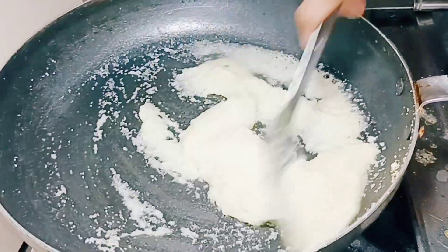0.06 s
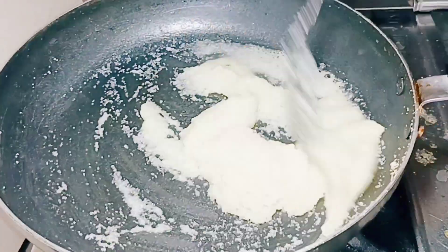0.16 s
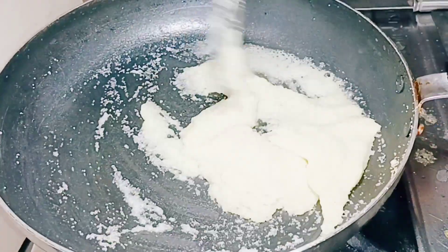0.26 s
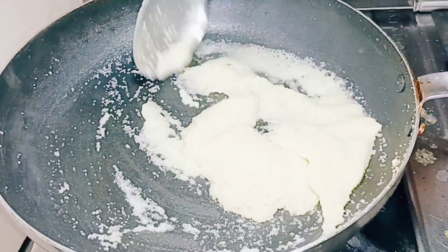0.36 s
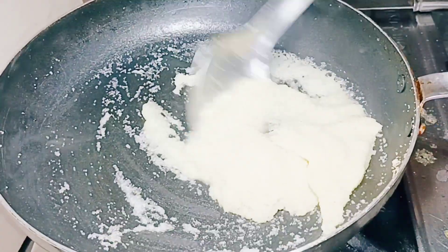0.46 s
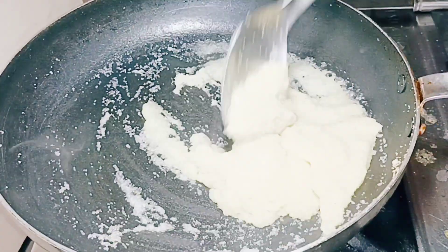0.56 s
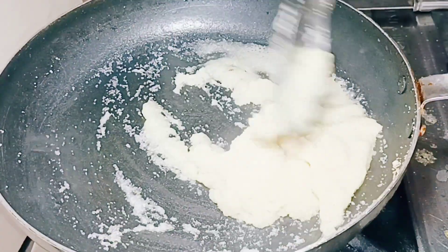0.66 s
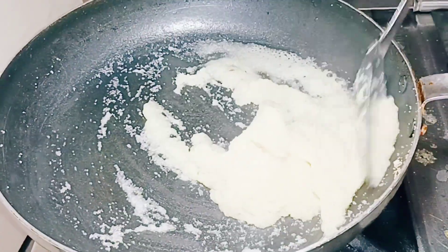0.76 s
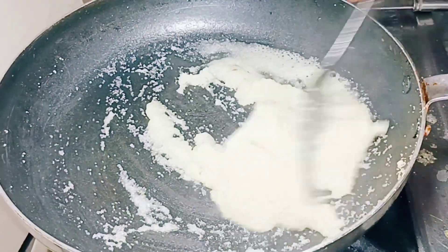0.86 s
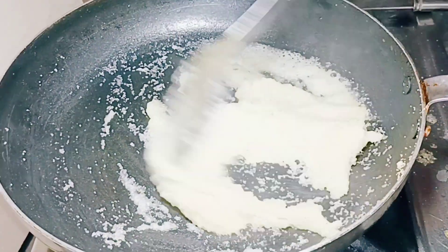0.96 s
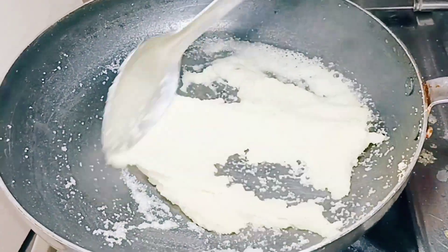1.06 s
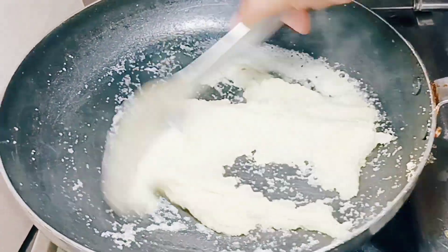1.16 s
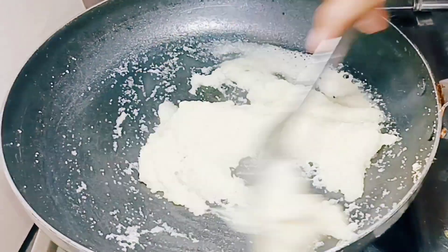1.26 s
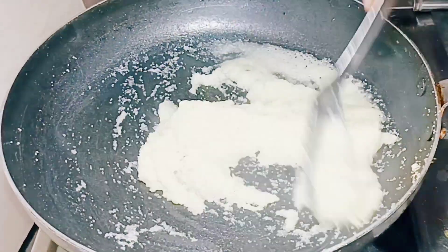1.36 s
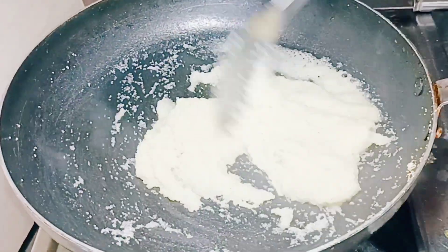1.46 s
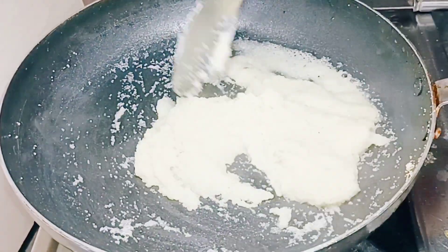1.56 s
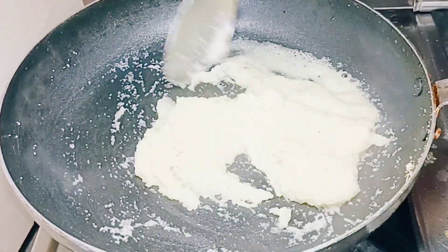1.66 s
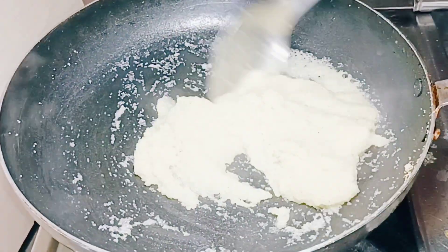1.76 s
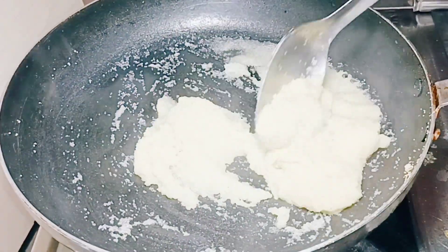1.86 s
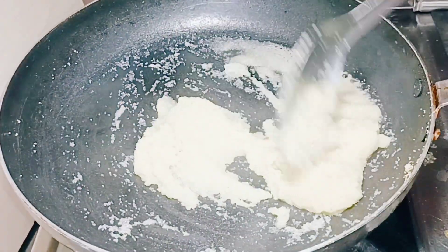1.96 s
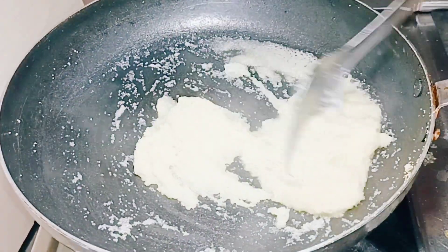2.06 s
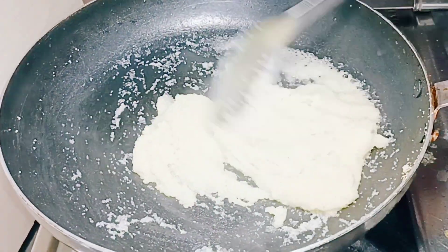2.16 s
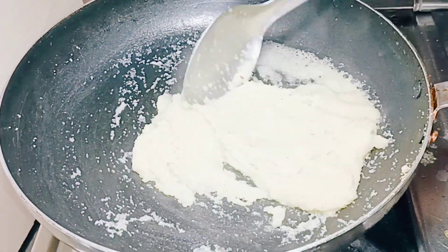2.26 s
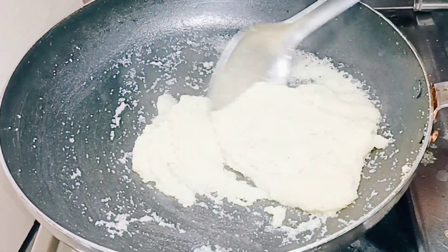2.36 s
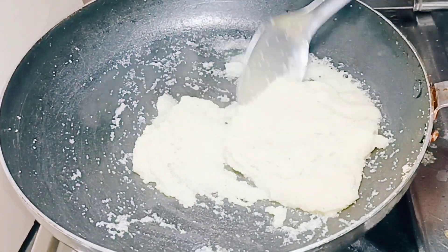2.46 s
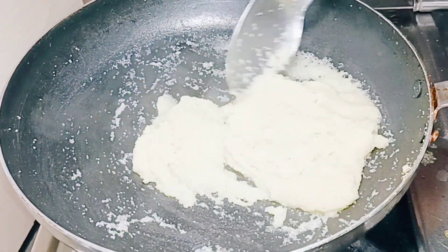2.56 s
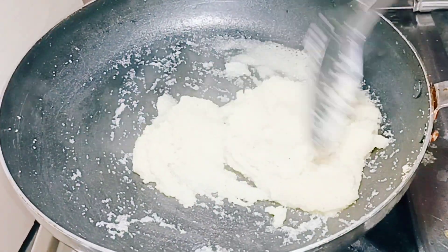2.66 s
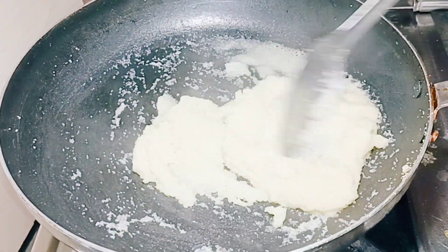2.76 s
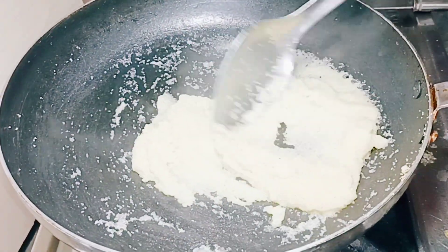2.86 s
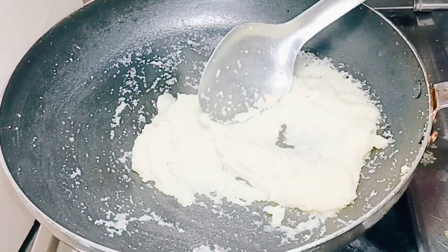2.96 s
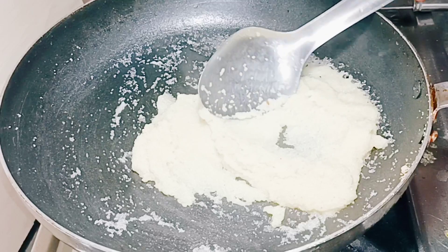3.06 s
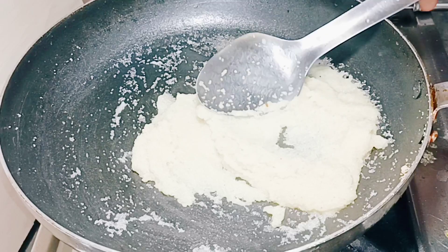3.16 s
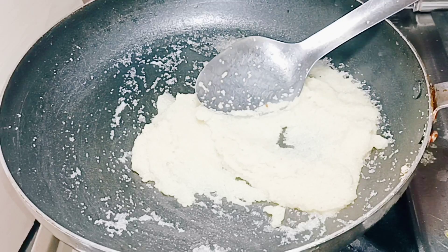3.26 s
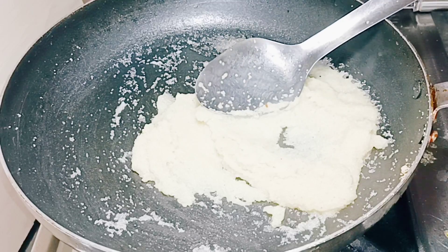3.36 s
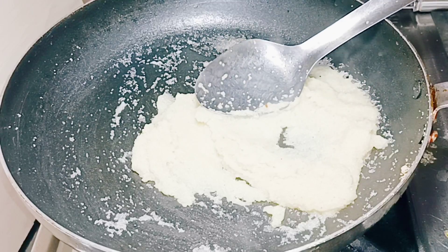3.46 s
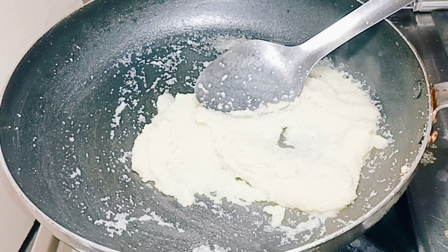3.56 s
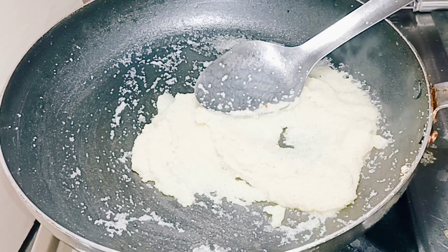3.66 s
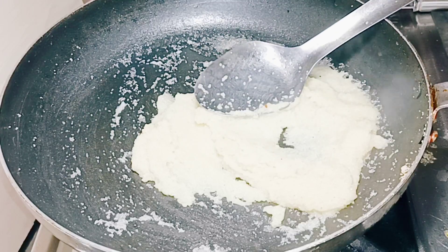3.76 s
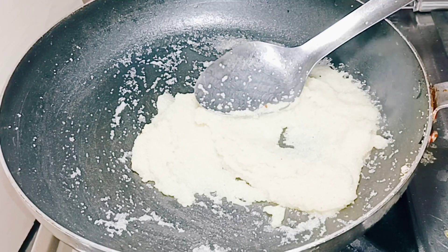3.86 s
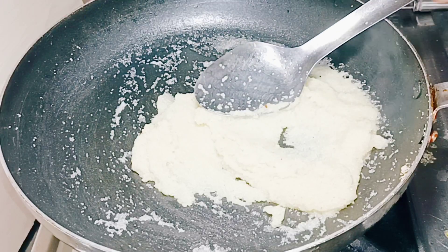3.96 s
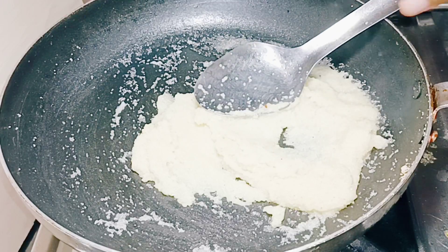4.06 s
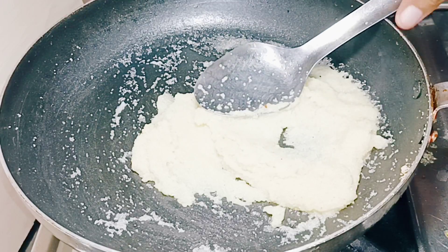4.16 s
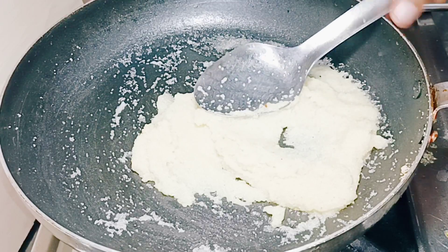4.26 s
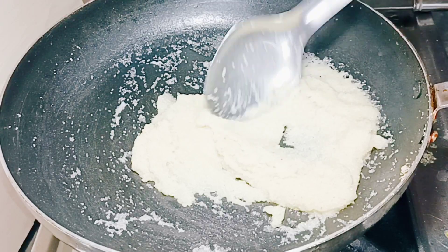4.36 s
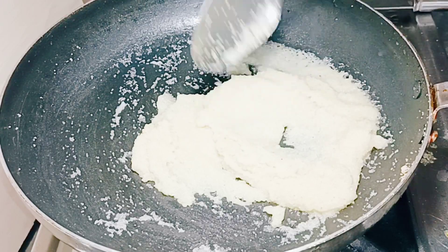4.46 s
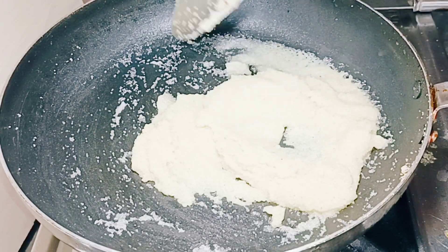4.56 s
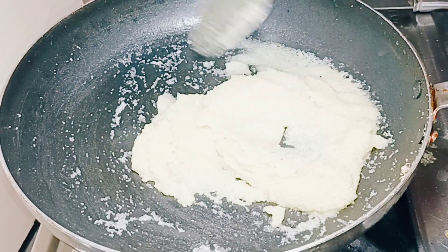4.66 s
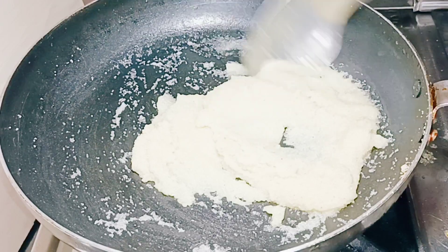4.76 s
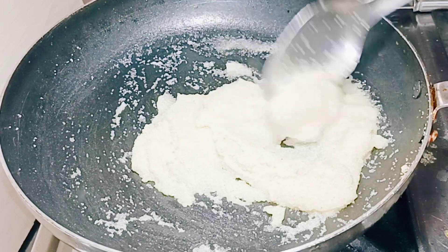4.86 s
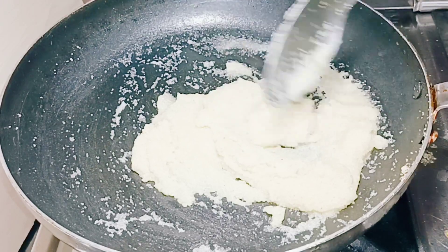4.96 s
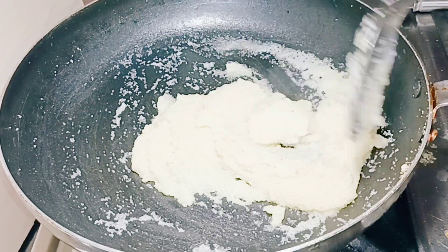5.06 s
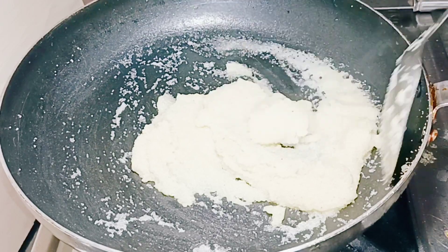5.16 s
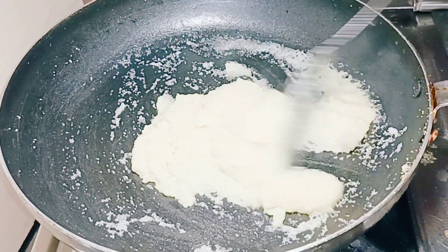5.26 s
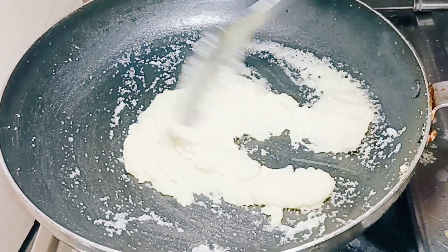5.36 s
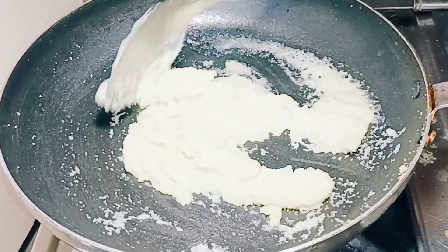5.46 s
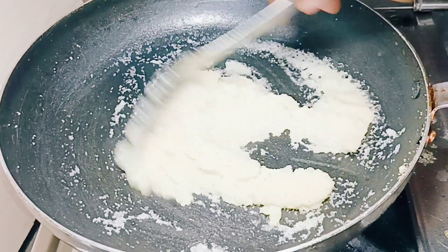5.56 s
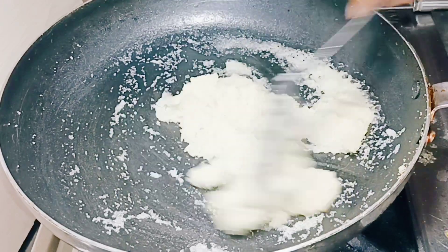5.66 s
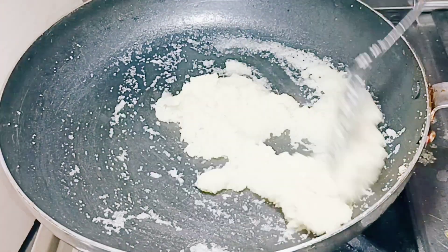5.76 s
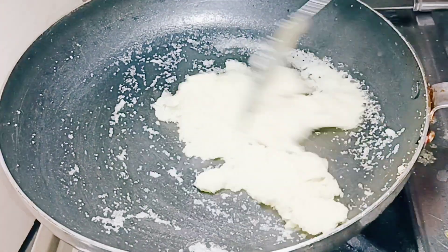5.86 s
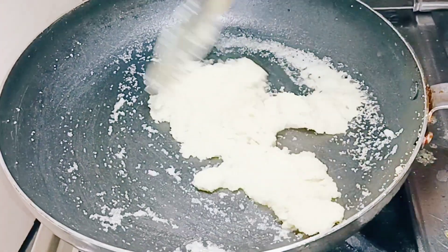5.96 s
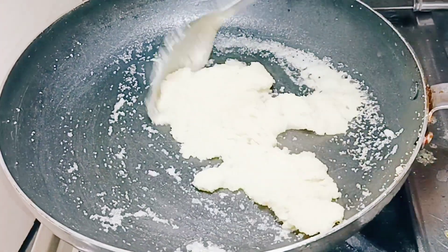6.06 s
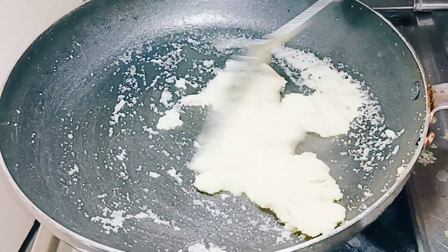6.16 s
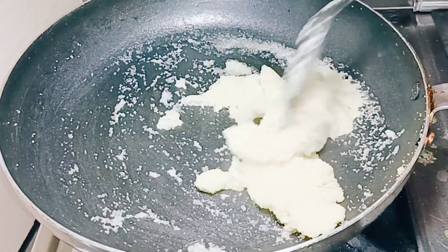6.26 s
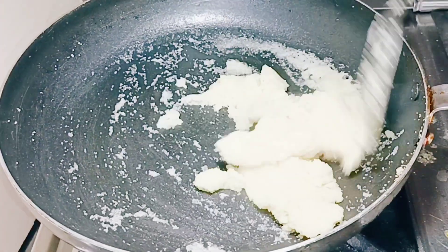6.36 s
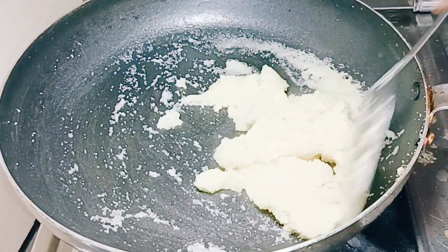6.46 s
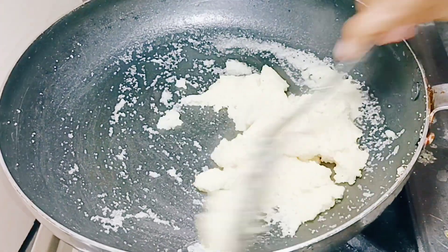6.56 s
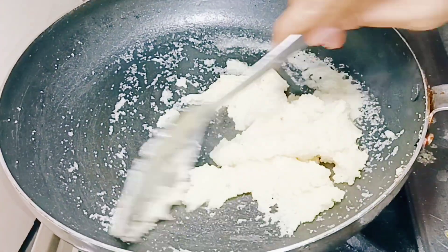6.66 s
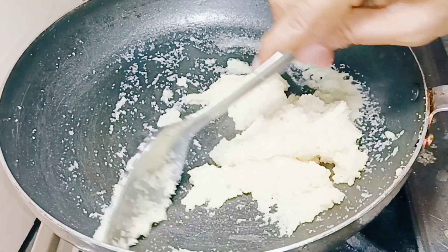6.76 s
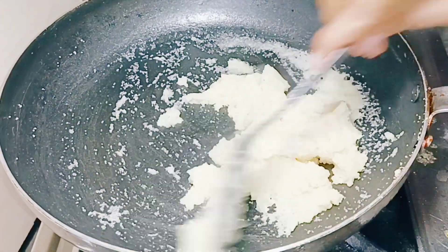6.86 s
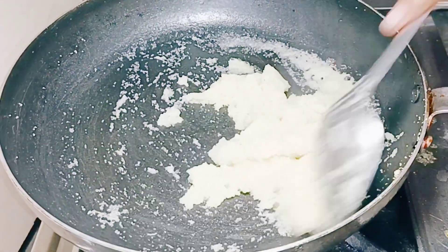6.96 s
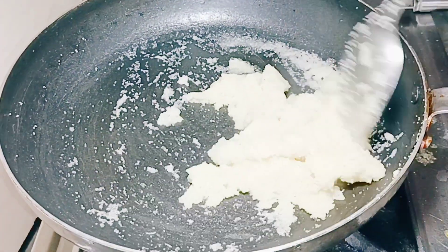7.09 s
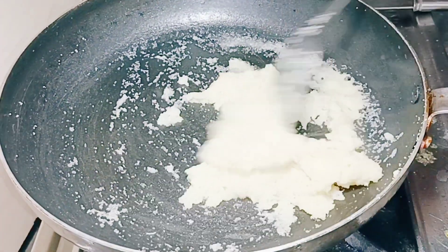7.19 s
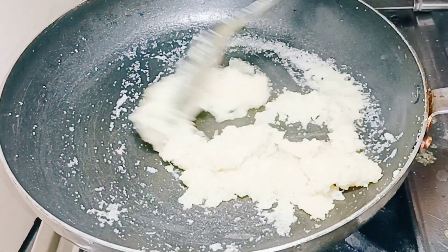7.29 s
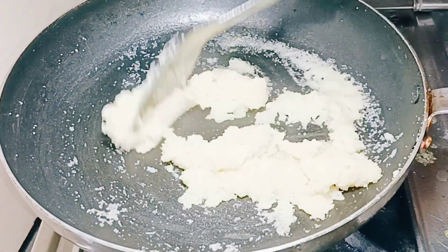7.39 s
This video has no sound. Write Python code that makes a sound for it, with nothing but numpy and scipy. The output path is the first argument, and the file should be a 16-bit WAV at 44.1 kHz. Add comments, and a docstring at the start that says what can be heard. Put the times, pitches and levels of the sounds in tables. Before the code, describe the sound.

A steel spoon stirs thick paste in a coated frying pan on a lit stove. Short hard clacks lead into gritty scrapes with rough squeaks and soft wet thuds. The strokes stop for about two seconds, leaving quiet sizzle, low stove noise and faint steam whistles, then return loud and frequent to the end. Close microphone in a small hard-walled kitchen, short tail.

```python
"""A steel spoon stirs thick paste in a coated frying pan on a lit stove, in a small kitchen.
First come quick strokes: noisy drags over the gritty coating, squeaks, and short clacks as the spoon lands.
In the middle the spoon mostly rests, with faint whistles, probably of steam escaping the paste; then loud
strokes return to the end. Shaped noise makes stove, sizzle and paste throughout; blows and tiny slips ring
the pan's resonances, rough gliding tones squeak and whistle, and the kitchen walls add a short tail."""
import sys
import numpy as np
from scipy import signal
from scipy.fft import rfft, irfft
from scipy.io import wavfile
from scipy.ndimage import uniform_filter1d

SR = 44100
rng = np.random.default_rng(int(sys.argv[2]) if len(sys.argv) > 2 else 0)


def unload_audio(sound):
    """Save the sound as a 16-bit wav file, at the path given as the first command line argument."""
    columns = np.transpose(np.atleast_2d(sound))
    # keep every value between -1 and 1, then stretch to whole-number steps
    steps = np.round(np.clip(columns, -1, 1) * 32767)
    wavfile.write(sys.argv[1], SR, steps.astype(np.int16))


N = 327663
TIME = np.arange(N) / SR


def from_db(db):
    """Turn decibels into a gain."""
    return 10 ** (np.asarray(db) / 20)


def rms_one(x):
    """Scale a sound to an average strength (rms) of 1."""
    return x / np.sqrt(np.mean(x ** 2) + 1e-20)


def evened(x, size=700):
    """Hold the short-term rms at 1, averaged over size samples, so that a separate level can shape it."""
    power = np.maximum(uniform_filter1d(x * x, size), 0)
    return x / np.sqrt(power + 1e-20)


def in_time(rows):
    """Draw straight lines between the rows to get each column at every sample."""
    s, *columns = np.transpose(rows)
    return [np.interp(TIME, s, c) for c in columns]


def gate(t, start, end, rise_s, fall_s):
    """One from start to end, with exponential edges."""
    return np.exp(np.minimum(t - start, 0) / rise_s - np.maximum(t - end, 0) / fall_s)


def drift(rate, size=N):
    """Wander randomly around 0, with rate new random values a second joined by straight lines."""
    steps = np.arange(size) * rate / SR
    count = int(steps[-1]) + 2
    return 1.2 * np.interp(steps, np.arange(count), rng.standard_normal(count))


def coloured(x, colour):
    """Filter to the given spectrum without sounding ahead of time (minimum phase)."""
    size = 2048
    hz, db = np.transpose(colour)
    log_grid = np.log(np.fft.rfftfreq(size, 1 / SR) + 1)
    log_gain = np.log(from_db(np.interp(log_grid, np.log(hz), db)))
    # folding the cepstrum moves the filter's energy to its start
    cepstrum = irfft(log_gain)[:size // 2]
    cepstrum[1:] *= 2
    response = irfft(np.exp(rfft(cepstrum, size)))
    return signal.oaconvolve(x, response)[:len(x)]


def three_bands(x, low_hz=1100, high_hz=3400):
    """Split a sound into its low, middle and high parts."""
    splits = ((low_hz, "low"), ([low_hz, high_hz], "band"), (high_hz, "high"))
    return [signal.sosfilt(signal.butter(4, edge, kind, fs=SR, output="sos"), x)
            for edge, kind in splits]


def resonance(x, hz, width_hz):
    """Ring at one pitch (two-pole filter, gain 1 at its peak); a narrower width rings longer."""
    r = np.exp(-np.pi * width_hz / SR)
    feedback = [1, -2 * r * np.cos(2 * np.pi * hz / SR), r * r]
    return signal.lfilter(np.array([1, 0, -1]) * (1 - r * r) / 2, feedback, x + 1e-18)


# Spectrum of the stove noise. Each row: frequency in Hz, gain in dB.
STOVE_SPECTRUM = [(20, -16), (45, -6), (100, 7.5), (170, -6.5), (270, -4), (420, -4), (800, -5),
                  (1400, -7.5), (3000, -22.5), (8000, -47)]


def stove(level_db=-71.5):
    """The lit stove is a steady, mostly low noise."""
    return from_db(level_db) * rms_one(coloured(rng.standard_normal(N), STOVE_SPECTRUM))


# Strength of the sizzle over time. Each row: time in seconds, level in dB before flicker.
SIZZLE_LEVEL = [(0, -65), (.8, -69.5), (2.1, -71.5), (2.85, -69), (3.1, -74), (3.5, -69.5), (4.3, -72),
                (4.7, -66.5), (5.2, -71), (7.43, -69.5)]
# Spectrum of the sizzle. Each row: frequency in Hz, gain in dB.
SIZZLE_SPECTRUM = [(800, -18), (1600, 4.5), (2500, 1.5), (3500, -3), (6300, -8), (7300, -16), (8200, -28),
                   (16000, -32)]


def frying(pop_spread_db=3, flicker_db=0.65):
    """Countless tiny bubbles burst at the rim of the paste: noise with an uneven strength."""
    sizzle_db, = in_time(SIZZLE_LEVEL)
    pop_db = pop_spread_db * np.minimum(rng.exponential(1, N), 5)
    pops = rng.standard_normal(N) * from_db(pop_db)
    return rms_one(coloured(pops, SIZZLE_SPECTRUM)) * from_db(sizzle_db + flicker_db * drift(25))


def shove(middle_s, length_s, edge_db=7):
    """A soft swell and fade, edge_db weaker at the ends of the shove than in its middle."""
    from_middle = 2 * (TIME - middle_s) / length_s
    return from_db(-edge_db * np.minimum(from_middle ** 2, 20))


# Spectrum of the rustle. Each row: frequency in Hz, gain in dB.
RUSTLE_SPECTRUM = [(90, -12.5), (220, 0), (450, -0.5), (800, -13.5), (1500, -11), (3000, -22.5),
                   (8000, -46)]


def rustle(rest_db=-83, lumpy_db=1.0):
    """Wet paste parts unevenly around the bowl of the spoon: noise that swells with each shove."""
    moved = from_db(rest_db) + sum(from_db(db) * shove(s, length_s) for s, length_s, _, db in PASTE_SHOVES)
    noise = rms_one(coloured(rng.standard_normal(N), RUSTLE_SPECTRUM))
    return noise * moved * from_db(lumpy_db * drift(35))


def lumps(band_hz):
    """Dull, low noise of moving paste, rms 1."""
    band = signal.butter(2, band_hz, "band", fs=SR, output="sos")
    return rms_one(signal.sosfilt(band, rng.standard_normal(N)))


# The spoon shifts paste without scraping; the rustle uses these rows too.
# Each row: middle in seconds, length in seconds, thud level in dB, rustle level in dB before unevenness.
PASTE_SHOVES = [(1.128, 0.2, -53, -58.5), (1.641, 0.085, -64, -84), (2.682, 0.12, -66.5, -89),
                (3.152, 0.15, -68, -68), (4.045, 0.16, -73, -79.5), (4.72, 0.35, -78, -66),
                (5.15, 0.36, -82, -68.5)]


def paste(thud_trim_db=-1, thud_delay_s=0.028):
    """Soft lumps thud just after each drag starts, and flop over more deeply when shoved."""
    thuds = sum(from_db(db + thud_trim_db) * gate(TIME - s, thud_delay_s, thud_delay_s, 0.032, 0.055)
                for s, *_, db in SPOON_DRAGS)
    flops = sum(from_db(db) * shove(s, length_s) for s, length_s, db, _ in PASTE_SHOVES)
    return thuds * lumps((115, 240)) + flops * lumps((33, 200))


def kitchen(x, wet_db=-10.0, t60_s=0.18, wall_cut_hz=9000):
    """Close hard walls add a diffuse tail that builds up and dies quickly; they swallow the top treble."""
    first_wall_s, build_s = 0.007, 0.014
    t = np.arange(SR // 2) / SR
    build_up = 1 - np.exp(-np.maximum(t - first_wall_s, 0) / build_s)
    tail = rng.standard_normal(len(t)) * from_db(-60 * t / t60_s) * build_up
    tail = tail / np.linalg.norm(tail)
    tail = signal.sosfilt(signal.butter(2, wall_cut_hz, fs=SR, output="sos"), tail)
    return x + from_db(wet_db) * signal.oaconvolve(x, tail)[:N]


# Resonances of pan and spoon.
# Each row: pitch in Hz, relative strength in dB, time to fade by 60 dB in seconds.
PAN_MODES = [(318, 12, 0.33), (600.7, -4, 0.069), (948, -12, 0.3), (1180, -8.5, 0.1), (1384, -7, 0.14),
             (1490, -0.5, 0.22), (1675, -3, 0.2), (2066, -6, 0.05), (2314, -4, 0.018), (2840, -10.5, 0.6),
             (2560, -10.5, 0.28), (2800, -6, 0.31), (3760, -1, 0.057), (4670, -1.5, 0.02),
             (5360, -5.5, 0.08), (5350, -5.5, .18), (5830, -0.5, .1), (6120, 1, 0.17), (5860, -11.5, 0.36),
             (7300, -2.5, 0.035)]


def pan(force, ring_db, place_spread_db=-0.9):
    """The damped pan answers broadly; how far each mode stands out depends on where it is touched."""
    place_db = place_spread_db * rng.standard_normal(len(PAN_MODES))
    ringing = sum(from_db(db + ring_db + extra) * resonance(force, hz, np.log(1000) / (np.pi * t60))
                  for (hz, db, t60), extra in zip(PAN_MODES, place_db))
    return force + ringing


# The spoon meets the pan. Each row: time in seconds, then the strength of the low, middle and high bands
# in dB (rms over the first 10 ms), then the resonance of the contact in Hz.
SPOON_KNOCKS = [(0.541, -23, -21, -28.5, 2170), (0.767, -79, -66, -63, 4483),
                (0.902, -31, -23, -24.5, 2750), (1.2524, -22, -33, -39.5, 584),
                (1.423, -54, -49, -50.5, 1200), (1.507, -49, -47, -65, 2000),
                (1.817, -23, -24, -27.5, 3110), (2.4654, -30, -34, -56.5, 599),
                (3.2436, -65, -45.5, -47.5, 2380), (4.8204, -24.5, -22.5, -27.5, 2320),
                (4.8302, -30, -29.5, -37.5, 1340), (5.097, -60.5, -68, -92, 1500),
                (5.183, -59.5, -63.5, -88, 1790), (5.2715, -39.5, -29.5, -38.5, 2960),
                (5.278, -43, -20, -23, 3000), (5.6372, -20.5, -17, -27, 2380),
                (5.8868, -29.5, -19, -32, 2630), (6.2027, -25, -19, -30, 1956),
                (6.4368, -82, -61, -62.5, 5500), (6.5532, -29.5, -22.5, -24, 2770),
                (6.8912, -23, -22, -31.5, 1770), (7.2741, -22.5, -14.5, -24, 2220)]
# Spectrum of the clacks. Each row: frequency in Hz, gain in dB.
CLACK_SPECTRUM = [(59, -66.5), (100, -32.5), (389, -14), (595, -3.5), (1150, -5.5), (1280, -7), (1650, 0.5),
                  (2080, -2.5), (2320, -2.5), (3050, -2.5), (3400, -7), (5770, -6), (7450, -16.5),
                  (8280, -28.5), (13000, -37), (16000, -34)]


def clacks(chatter_db=-17, chatter_t60_s=0.044, contact_db=5, contact_width_hz=260):
    """The edge lands in one sharp blow and a dying chatter; the paste damps the ring quickly."""
    out = np.zeros(N + SR)
    t = np.arange(SR // 5) / SR
    attack = SR // 100
    for s, *band_db, hz in SPOON_KNOCKS:
        force = from_db(chatter_db - 60 * t / chatter_t60_s) * rng.standard_normal(len(t))
        force[0] += 1  # the blow itself
        force = force + from_db(contact_db) * resonance(force, hz, contact_width_hz)
        bands = three_bands(coloured(pan(force, ring_db=3.5), CLACK_SPECTRUM))
        at = round(s * SR)
        out[at:at + len(t)] += sum(from_db(db) * band / np.std(band[:attack])
                                   for db, band in zip(band_db, bands))
    return out[:N]


# Squeaks of the spoon's edge, and faint whistles, probably of steam escaping the paste.
# Each row: start in seconds, length in seconds, first pitch in Hz, last pitch in Hz,
# level in dB before trim, roughness in random changes per second.
SQUEAKS_AND_WHISTLES = [(0, 0.019, 1855, 1895, -20, 170), (.1, 0.13, 3280, 2586, -29, 338),
                        (.08, 0.22, 1950, 1067, -28, 401.5), (.09, .16, 5850, 5740, -42, 390),
                        (.24, 0.068, 474, 403, -47, 90), (.545, 0.052, 1143, 1100, -21.5, 131),
                        (.585, 0.032, 2900, 2910, -29.5, 253), (1.422, 0.092, 328, 328, -44.5, 39.7),
                        (1.617, 0.11, 606, 602, -63.5, 50.5), (2.46, 0.047, 568, 528, -38.5, 112),
                        (2.681, 0.093, 591, 590, -65, 60), (2.889, 0.068, 4650, 4650, -67, 150),
                        (3.233, 0.097, 782, 766, -48.5, 70), (3.52, .33, 2590, 2665, -62, 130),
                        (3.755, .11, 3330, 3450, -62.5, 120), (3.754, 0.078, 5600, 5670, -56, 460),
                        (4.42, 0.095, 5900, 6210, -66, 179), (4.585, 0.47, 4770, 4800, -70.5, 157),
                        (4.825, 0.044, 1382, 1410, -26, 150), (4.86, 0.083, 2050, 2007, -33.5, 198),
                        (5.09, 0.055, 732, 770, -58.5, 70), (5.17, .06, 1820, 1840, -55, 110),
                        (5.333, 0.09, 4520, 4700, -32.5, 329), (5.345, 0.082, 2560, 2548, -29.5, 300),
                        (6.02, 0.18, 5230, 5300, -64.5, 111), (6.216, 0.076, 682, 706, -31.5, 121.5),
                        (6.6, 0.082, 1740, 1797, -31.5, 226), (6.62, 0.097, 672, 565, -24.5, 101.4),
                        (6.743, 0.13, 1527, 1450, -61, 70), (6.931, 0.17, 930, 944, -24.5, 204.6),
                        (6.95, 0.21, 2183, 1830, -25.5, 385.6), (6.96, 0.23, 5940, 5610, -36.5, 600)]


def squeaks_and_whistles(trim_db=-1):
    """Each one swells and fades as a rough, narrow band gliding from its first pitch to its last."""
    out = np.zeros(N + SR)
    for s, length_s, hz, end_hz, db, roughness in SQUEAKS_AND_WHISTLES:
        at, size = round(s * SR), round(length_s * SR)
        phase = 2 * np.pi * np.cumsum(np.linspace(hz, end_hz, size)) / SR
        tone = drift(roughness, size) * np.cos(phase) + drift(roughness, size) * np.sin(phase)
        out[at:at + size] += from_db(db + trim_db) * evened(tone, size=1300) * np.hanning(size)
    return out[:N]


def sliding_contact(force, count=22, ring_db=5):
    """As the contact point travels, resonances between spoon and pan come and go."""
    centres = np.geomspace(600, 7200, count) * np.exp(rng.normal(0, 0.04, count))
    rings = sum(drift(28, len(force)) * resonance(force, hz, 40 + hz / 60) for hz in centres)
    return force + from_db(ring_db) * rings


def push_db(t, peak_s, length_s, swell_db, ease_db=7):
    """The hand moves smoothly to the peak of its push, then slackens by ease_db before the spoon lifts."""
    lean = np.clip(t / peak_s, 0, 1)
    slacken = np.clip((t - peak_s) / max(length_s - peak_s, 1e-3), 0, 1)
    return -swell_db * np.cos(np.pi / 2 * lean) ** 2 - ease_db * slacken


# The spoon is pushed across the pan, then eases off and lifts; the paste thuds use these rows too.
# Each row: start in seconds, time to the peak of the push in seconds, length in seconds, swell up to the
# peak in dB (negative sinks), middle band in dB before pan and trim, low and high bands in dB relative to
# the middle, top treble level change in dB before unevenness, paste thud in dB before its trim.
SPOON_DRAGS = [(0.0, 0.016, 0.035, -0.5, -24, -17, 1, 12.5, -63.5),
               (0.049, 0.11, .21, 5, -29, -10.5, -1.5, 5.5, -66),
               (0.551, 0.047, 0.073, 5.5, -24, -6.5, -5.5, 5, -52.5),
               (0.907, 0.04, 0.12, 7, -34.5, -0.5, 1, 6.5, -50),
               (1.264, 0.058, 0.075, 15, -29, -5.5, -4, 9, -59.5),
               (1.416, 0.025, 0.072, 4.5, -44, 4, -4, 8, -75.5),
               (1.827, 0.078, 0.099, 6.5, -29.5, -3.5, -5.5, 2, -57.5),
               (2.474, .03, 0.085, -5.5, -38.5, -4.5, -20, -8, -65),
               (3.246, .025, 0.048, 8, -52.5, 6, 1, -4, -59.5),
               (4.831, 0.084, 0.097, 8, -25, -7.5, 0, -4.5, -50.5),
               (5.286, .1, 0.12, 20.5, -28.5, -6, -2.5, 3, -49),
               (5.648, 0.048, 0.096, 2.5, -26, -9, -5, 0, -51.5),
               (5.896, 0.056, 0.079, 6, -25, -10.5, -12.5, 10, -49),
               (6.213, 0.048, 0.069, 7.5, -27.5, -3.5, -8, -2, -56),
               (6.563, 0.15, .16, 2, -34.5, -3, -2.5, 5, -47.5),
               (6.901, 0.076, 0.23, 6, -24.5, -3, -8.5, 3.5, -57),
               (7.285, 0.062, .069, 11, -23.5, -5, -6.5, -4, -55)]
# Spectrum of the scraping before its bands are evened. Each row: frequency in Hz, gain in dB.
DRAG_SPECTRUM = [(100, -37), (250, -13), (420, 1.5), (600, 6), (1200, 1.5), (2700, -2), (3600, -10),
                 (6300, -10.5), (7300, -19), (8000, -30.5), (10000, -36.5), (13500, -46.5), (15300, -36),
                 (16500, -43)]


def drags(grains_per_s=6000, grain_spread_db=2.5, judder_db=0.5, judder_rate=260, uneven_db=3, trim_db=-3.0):
    """The edge catches on the grit in dense tiny slips, and judders as it is pushed."""
    out, size = np.zeros(N + SR), SR // 2
    t = np.arange(size) / SR
    push_shares = (1, 1.0, 1.2)  # how far the low, middle and high bands follow the push
    top_treble = signal.butter(6, 9000, "high", fs=SR, output="sos")
    for s, peak_s, length_s, swell_db, middle_db, low_db, high_db, treble_db, _ in SPOON_DRAGS:
        slips = (rng.random(size) < grains_per_s / SR) * rng.choice([-1, 1], size)
        grain_db = grain_spread_db * np.minimum(rng.exponential(1, size), 4)
        force = slips * from_db(grain_db + judder_db * drift(judder_rate, size))
        bands = three_bands(coloured(sliding_contact(force), DRAG_SPECTRUM))
        push = push_db(t, peak_s, length_s, swell_db)
        scrape = sum(evened(band) * from_db(middle_db + db + share * push)
                     for band, db, share in zip(bands, (low_db, 0, high_db), push_shares))
        touching = gate(t, 0.001, length_s, rise_s=0.0028, fall_s=0.005)
        sound = pan(scrape * touching, ring_db=-3.0)
        # the top treble is uneven, with its own level for each drag
        treble_gain = from_db(treble_db + uneven_db * drift(130, size))
        treble_change = (treble_gain - 1) * signal.sosfiltfilt(top_treble, sound)
        at = round(s * SR)
        out[at:at + size] += sound + treble_change
    return from_db(trim_db) * out[:N]


def scene():
    """Spoon and whistles excite the kitchen; food and stove lie underneath. Both ears hear the same."""
    in_kitchen = kitchen(clacks() + drags() + squeaks_and_whistles())
    food = paste() + rustle() + frying()
    return np.tile(in_kitchen + food + stove(), (2, 1))


def record(dry, cutoff_hz=16100):
    """Cut the top steeply."""
    return signal.sosfilt(signal.ellip(10, 0.1, 80, cutoff_hz, fs=SR, output="sos"), dry)


dry = scene()
out = record(dry)
unload_audio(out)
```